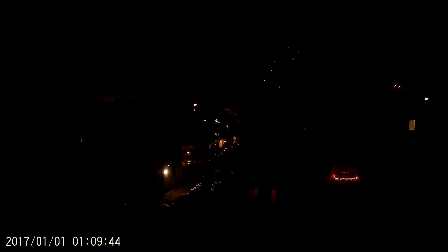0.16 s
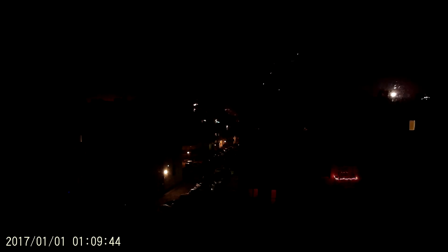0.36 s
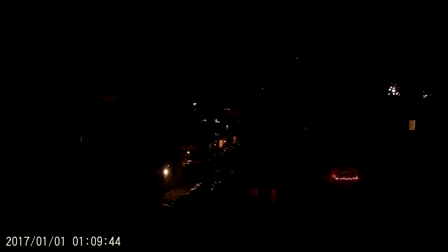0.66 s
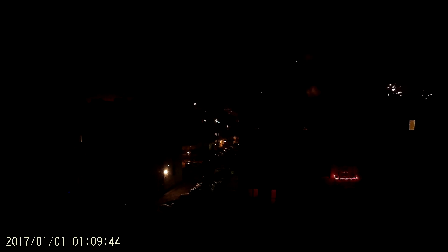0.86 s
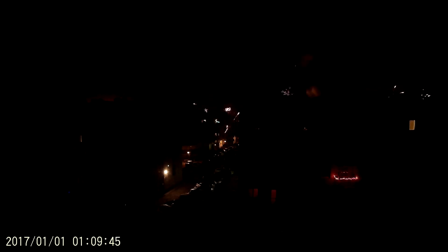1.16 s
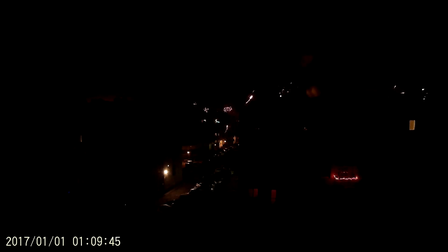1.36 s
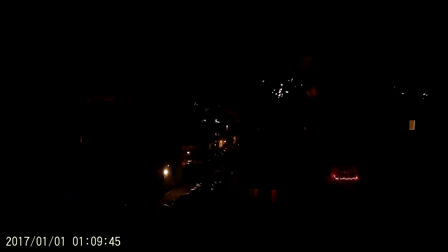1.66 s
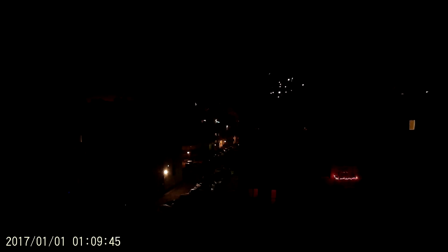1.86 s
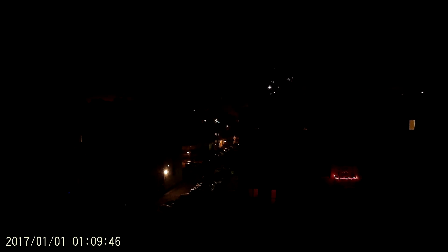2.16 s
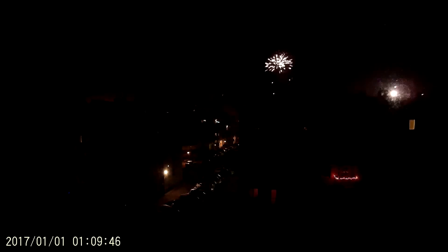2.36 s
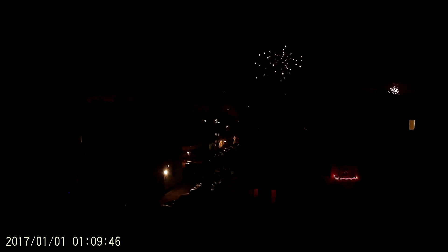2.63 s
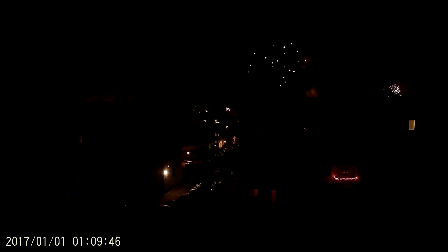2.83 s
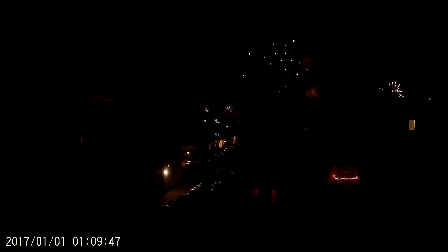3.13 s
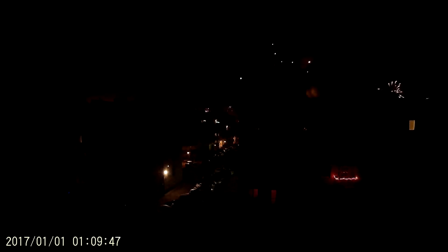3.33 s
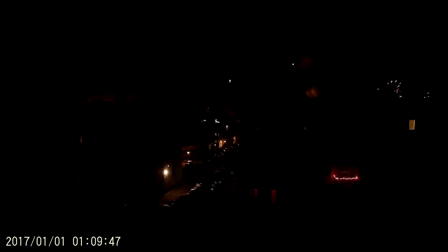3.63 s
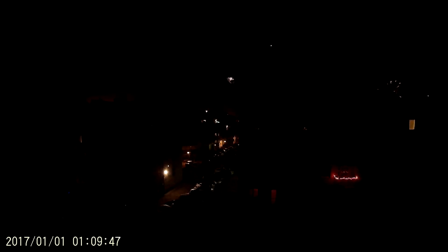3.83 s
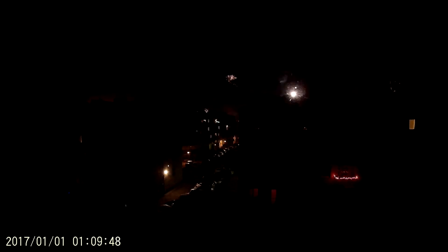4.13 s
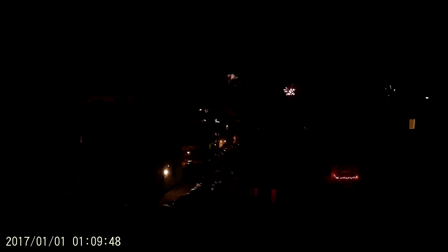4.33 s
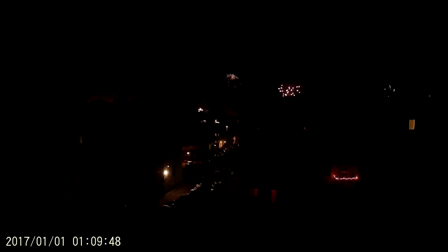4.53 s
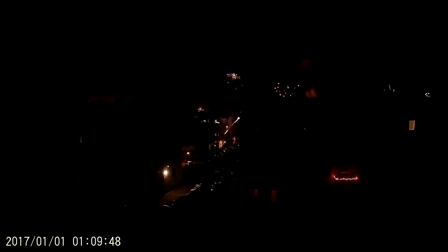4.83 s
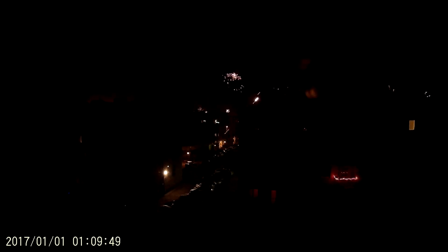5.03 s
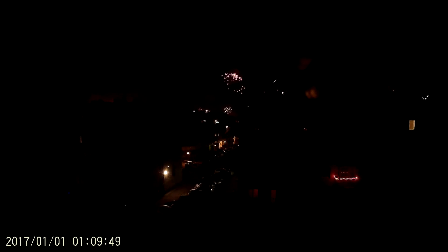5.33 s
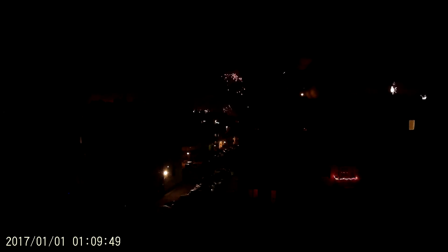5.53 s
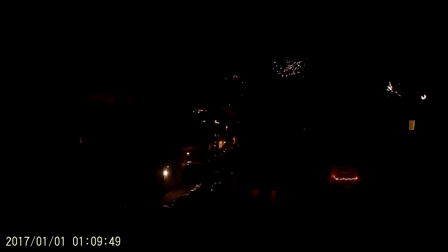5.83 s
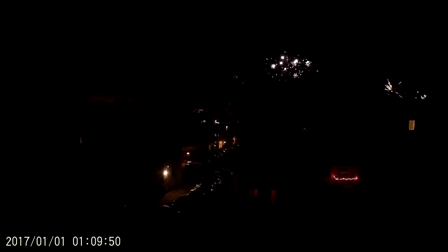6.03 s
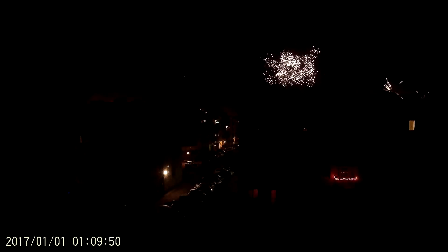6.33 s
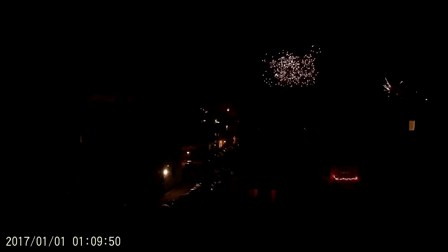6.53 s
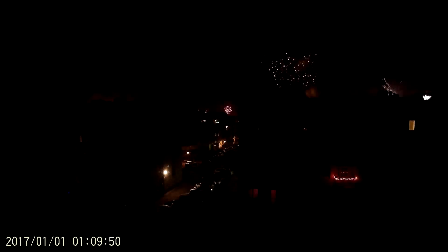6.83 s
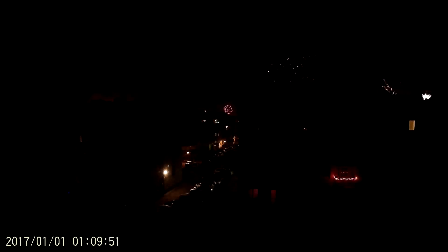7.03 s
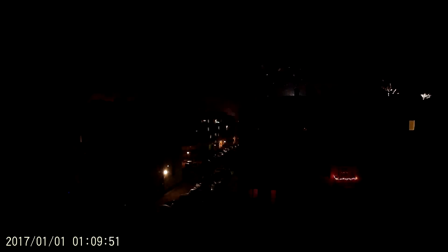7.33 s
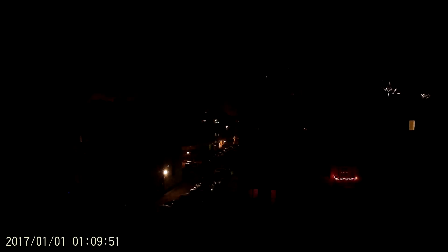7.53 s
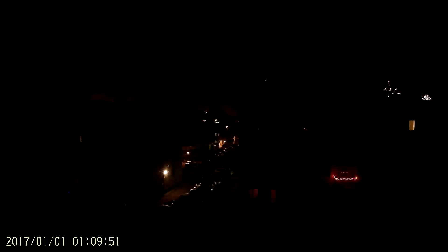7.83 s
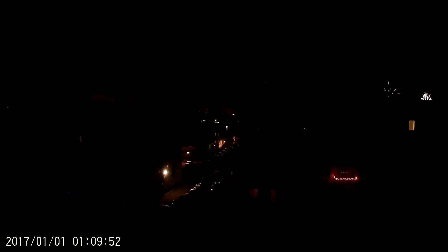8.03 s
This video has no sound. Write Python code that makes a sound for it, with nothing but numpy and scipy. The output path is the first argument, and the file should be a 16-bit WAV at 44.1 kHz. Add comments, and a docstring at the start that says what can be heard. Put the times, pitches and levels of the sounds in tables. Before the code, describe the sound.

Firework shells burst irregularly, near and far, over a residential street at night, each bang echoing between the houses. Dull thuds and faint hollow pops come first, then a loud boom, two sharp close cracks and a run of heavier bangs. Crackling swells above a distant rumble and low town drone. A small camera microphone makes it muffled and slightly ringing, with faint hiss and whine.

```python
"""Firework shells burst near and far over a street at night, each bang echoing between the houses. Burning
stars crackle above a distant rumble and the town's low drone, with faint fizzes, hollow pops and two sharp
cracks close by. A small camera picks it up: its housing muffles and rings, with a brief high ping on the
loudest bangs, and it hisses and whines faintly, more while treble keeps its expander open."""
import sys
import numpy as np
from scipy import signal
from scipy.fft import rfft, irfft, next_fast_len
from scipy.io import wavfile
from scipy.ndimage import uniform_filter1d, minimum_filter1d, map_coordinates

SR = 44100
rng = np.random.default_rng(int(sys.argv[2]) if len(sys.argv) > 2 else 0)


def wav_out(sig):
    """Save sig, one row per channel (or a flat mono array), as 16-bit PCM at SR to the path in sys.argv[1]."""
    wavfile.write(sys.argv[1], SR, np.round(np.clip(np.atleast_2d(sig).T, -1, 1) * 32767).astype(np.int16))


N = 360738

# Shells bursting; more tilt is brighter: start_s, level_db, tilt_db_per_octave, echo_db
SHELL_BURSTS = [(0.01, -29.5, -1, 5), (0.18, -33.5, -2.5, -11), (0.52, -38, -1.5, 13),
                (0.7615, -32.5, -1, 0), (1.337, -25, -7, -2), (1.3552, -23.5, -4, 3),
                (1.4991, -31.5, -2, -5), (1.7597, -25, -3, 6), (1.795, -31, 1, 7), (1.868, -38, 12, -1),
                (1.945, -26.5, -0.5, 4.5), (2.0772, -32, 0, -13), (2.3811, -32, -2.5, 9),
                (2.4947, -28, -3, 9), (2.561, -8, -0.5, 3), (2.6532, -24, -7, -5.5),
                (2.7249, -23.5, 1, 8.5), (2.75, -21, 1, 5.5), (2.9579, -20.5, -3.5, 1.5),
                (3.0965, -22.5, 2, -13.5), (3.3562, -19, -5, 2), (3.416, -18.5, -4.5, -3),
                (3.6531, -26, -3.5, 4), (3.8359, -24, 0, 6.5), (3.9019, -23.5, 2, 9),
                (4.1716, -34.5, -2.5, 15.5), (4.4115, -33, -2.5, 2), (4.7515, -33.5, 0.5, 5),
                (4.9251, -25.5, -3.5, 8), (5.1162, -24.5, 1, 9.5), (5.2301, -24.5, 4, 8),
                (5.3365, -13, 1, 0.5), (5.5236, -21.5, -2, 4), (5.635, -35.5, 2, 16),
                (5.966, -7, -1.5, 0.5), (6.1511, -20.5, -1, 4.5), (6.3902, -22.5, -6.5, 2.5),
                (6.4208, -17.5, 2, 7), (6.4761, -12.5, -1.5, 3), (6.4969, -20, -5, -11),
                (6.5319, -22.5, 6.5, 5.5), (6.921, -16, -1.5, 3), (7.099, -26, -2.5, -1),
                (7.1743, -20.5, -2, 3), (7.27, -22, 3.5, 0.5), (7.458, -25.5, -6, -1),
                (7.672, -31, -2.5, 6), (7.8195, -27, -2, 8), (8.097, -23, -2.5, 4.5)]
# Crackers close by: start_s, level_db, pitch_ratio, tilt_db_per_octave, echo_db
CLOSE_CRACKS = [(4.3673, -20, 1.22, -1.5, -23), (4.5983, -7.5, 0.994, 0, -5.5)]
# Swarms of stars, the burning pellets a shell throws out: start_s, burn_s, level_db
STAR_SWARMS = [(0.0, 0.46, -52.5), (0.58, 0.22, -49.5), (1.44, 0.052, -47), (1.871, 0.21, -50),
               (2.78, 0.47, -38), (3.42, 0.081, -40), (3.62, 0.48, -44.5), (4.198, 0.28, -47),
               (4.97, 0.11, -45.5), (5.131, 0.12, -39), (5.42, 0.25, -42.5), (6.12, 0.23, -33.5),
               (6.5, 0.545, -39.5), (7.201, 0.11, -40.5), (7.86, 0.12, -47.5), (8.121, 0.18, -43)]
# How loud the fireworks across town are: time_s, level_db
FAR_LEVELS = [(0, -42), (0.4, -52.5), (0.75, -51.5), (1.2, -56), (1.6, -46), (2.2, -52.5), (3.2, -49),
              (3.8, -46), (4.7, -54.5), (5.3, -41.5), (5.9, -52.5), (6.3, -39), (7.4, -52.5), (8.18, -48)]
# Faint high fizzes: middle_s, length_s, level_db
FIZZ_SWELLS = [(0.014, 0.07, -71), (.125, .06, -72), (.245, .06, -75), (6.492, 0.078, -67.5),
               (6.808, 0.063, -67.5), (7.901, 0.17, -76)]
# Hollow pops; fade is the time to drop 60 dB: start_s, pitch_hz, level_db, fade_s
HOLLOW_POPS = [(1.31, 570, -35, 0.1), (1.365, 567, -36.5, 0.57), (1.498, 1068, -32, 0.08),
               (4.751, 1068, -37.5, 0.12)]
# The brief high ping on the loudest bangs: pitch_hz
PING_PITCHES = [5170, 10800]
# Echoes off the ground and the nearest walls: delay_s, gain
WALL_ECHOES = [(.0033, 0.54), (.0046, 0.33), (.0087, 0.33), (0.0135, .2)]

# The tone of each sound, from bass to treble: frequency_hz, relative_level_db
TOWN_TONE = [(20, -18), (45, -10), (58, -2.5), (72, -7.5), (88, -4), (110, -9.5), (400, -28), (1200, -38.5)]
RUMBLE_TONE = [(20, -27), (35, -18), (60, -18.5), (105, -12.5), (150, -6), (230, -1.5), (350, -1),
               (600, -13.5), (1200, -22), (3000, -69)]
CRACKLE_TONE = [(100, -35.5), (250, -9.5), (450, -2), (800, 1), (960, -3), (1100, -12), (1300, -17),
                (1700, -20), (2300, -31), (3200, -40.5), (5000, -53), (7000, -90.5), (15000, -110)]
BLAST_TONE = [(25, -39), (55, -22.5), (100, -10.5), (200, 1), (450, 3), (800, -0.5), (960, -2),
              (1100, -7.5), (1300, -16.5), (1700, -22), (2300, -34.5), (3200, -42), (5000, -67.5),
              (7000, -72.5), (15000, -110)]
FIZZ_TONE = [(2500, -28), (3500, -3), (3900, 3), (4500, -7), (6000, -19)]
SNAP_TONE = [(30, -22), (70, -7.5), (214, 1), (663, -3), (938, -1), (1270, -11.5), (1880, -11.5),
             (2360, -23.5), (2780, -50), (3270, -24.5), (4620, -21.5), (5680, -45), (6840, -37.5),
             (12000, -71.5)]
HISS_TONE = [(20, 0), (2500, 1.5), (7000, -2.4), (15000, -3)]

# Notes the camera's housing rings at: pitch_hz, width_hz, boost_db
HOUSING_NOTES = [(230.8, 9.5, 6), (253, 11, -2), (441.3, 23.5, 5), (569.3, 19.2, 9.5), (736, 26, 2.5),
                 (928, 40, 7), (1381, 31, 5.5)]
# The camera's electronic whine: pitch_hz, relative_level_db
WHINE_NOTES = [(9416, -11), (9489, -1), (9525.4, 0), (9561.7, 0), (9634.6, -8), (9707, -12)]


def amp(db):
    """Turn decibels into a number to multiply by."""
    return 10 ** (np.asarray(db) / 20)


def unit(x):
    """Scale x to an average (rms) level of 1."""
    return x / np.sqrt(np.mean(x ** 2) + 1e-20)


def tone_db(tone, hz):
    """Read a tone table at any frequency, on a scale of octaves."""
    table_hz, table_db = np.transpose(tone)
    return np.interp(np.log(hz + 1), np.log(table_hz + 1), table_db)


def add(out, start_s, x):
    """Mix x into out from start_s on."""
    start = max(0, round(start_s * SR))
    out[start:start + len(x)] += x[:max(0, len(out) - start)]


def noise(tone):
    """Steady noise with the given tone, at level 1."""
    size = next_fast_len(N)
    gains = amp(tone_db(tone, np.fft.rfftfreq(size, 1 / SR)))
    return unit(irfft(rfft(rng.standard_normal(size)) * gains, size)[:N])


def clicks(samples, per_s, spread_db):
    """Clicks at random moments and of random sizes, at level 1."""
    hits = rng.random(samples) < per_s / SR
    sizes = amp(spread_db * np.clip(rng.standard_normal(samples), -2, 2))
    return unit(hits * sizes * rng.choice([-1, 1], samples))


def wobble(per_s):
    """Straight lines joining per_s random values a second."""
    values = rng.standard_normal(int(N * per_s / SR) + 4)
    return map_coordinates(values, [np.arange(N) * per_s / SR], order=1)


def housed_pulse(tone, tilt=0, treble_slope=0, size=8192):
    """One pulse ringing in the housing; more tilt or treble_slope (dB per octave) is brighter."""
    hz = np.fft.rfftfreq(size, 1 / SR)
    db = tone_db(tone, hz) + tilt * np.log2(np.clip(hz, 130, 1600) / 500)
    db += treble_slope * np.log2(np.maximum(hz / 1200, 1))
    db += sum(boost / (1 + (2 * (hz - pitch) / width) ** 2) for pitch, width, boost in HOUSING_NOTES)
    # keep this tone, but make the pulse hit first and ring afterwards
    cepstrum = irfft(np.log(amp(db)))
    cepstrum[1:size // 2] *= 2
    cepstrum[size // 2 + 1:] = 0
    return irfft(np.exp(rfft(cepstrum)))


def street_paths(echo_db, wall_gain, early_fade_s=0.44, late_fade_s=1.58, late_db=-15):
    """A bang arrives directly, off the nearest walls, and scattered between the houses."""
    t = np.arange(SR) / SR
    fade = amp(-60 * t / early_fade_s) + amp(late_db - 60 * t / late_fade_s)
    rise = 1 - np.exp(-(t / 0.0032) ** 2)
    paths = rise * fade * clicks(SR, per_s=3500, spread_db=2.5)
    paths *= amp(echo_db) / np.linalg.norm(paths)
    paths[0] += 1  # the direct sound
    for delay_s, gain in WALL_ECHOES:
        shift = np.exp(0.06 * rng.standard_normal())  # each shell bursts in another direction
        paths[round(delay_s * shift * SR)] += wall_gain * gain
    return paths


def blast(pulse, paths):
    """Scale a pressure pulse to a peak of 1 and send it along all its paths."""
    return signal.fftconvolve(pulse / np.abs(pulse).max(), paths)


def town_drone(level_db=-65.5):
    """The town makes a steady low noise."""
    return amp(level_db) * noise(TOWN_TONE)


def star_power(t, rise_s=0.014, thin_db_per_s=9.5, die_db_per_s=182):
    """Power of the crackle: each swarm lights, thins out as its stars burn away, then dies."""
    power = np.zeros(N)
    for start_s, burn_s, level_db in STAR_SWARMS:
        age = np.maximum(t - start_s, 0)
        fall_db = thin_db_per_s * age + die_db_per_s * np.maximum(age - burn_s, 0)
        power += (amp(level_db - fall_db) * np.minimum(age / rise_s, 1)) ** 2
    return power


def rolling_power(t, rise_s=0.093, fade_s=2.76):
    """Power of each burst rolling back from the streets around, swelling and slowly dying."""
    power = np.zeros(N)
    for start_s, level_db, _, echo_db in SHELL_BURSTS:
        age = np.maximum(t - start_s, 0)
        swell = amp(level_db - 60 * age / fade_s) * np.minimum(age / rise_s, 1)
        power += (1 + amp(echo_db) ** 2) * swell ** 2
    return power


def rumble_and_crackle(roll_rumble_db=-35, roll_crackle_db=-37.5, far_crackle_db=-3, clump_db=2.07):
    """Countless far bangs and rolling echoes blur into a rumble; stars crackle above it."""
    t = np.arange(N) / SR
    far = amp(np.interp(t, *np.transpose(FAR_LEVELS))) ** 2
    rolling = rolling_power(t)
    rumble_power = far + amp(roll_rumble_db) ** 2 * rolling
    crackle_power = amp(far_crackle_db) ** 2 * far + amp(roll_crackle_db) ** 2 * rolling + star_power(t)
    rumble = signal.fftconvolve(clicks(N, per_s=500, spread_db=1.5), housed_pulse(RUMBLE_TONE))
    crackle = signal.fftconvolve(clicks(N, per_s=2000, spread_db=0.5), housed_pulse(CRACKLE_TONE))
    out = np.zeros(N)
    for sound, power in (rumble, rumble_power), (crackle, crackle_power):
        clumps = amp(clump_db * wobble(per_s=22))  # pops and echoes arrive in uneven bunches
        out += np.sqrt(power) * clumps * unit(sound[:N])
    return out


def shells(boost_db=0.5, neutral_db=-14):
    """Shells burst: dull thuds far away, harder bangs overhead."""
    out = np.zeros(N)
    for start_s, level_db, tilt, echo_db in SHELL_BURSTS:
        # loud bangs sound brighter, faint ones duller
        treble_slope = 0.41 * (level_db + max(echo_db, 0) - neutral_db)
        pulse = housed_pulse(BLAST_TONE, tilt, treble_slope)
        paths = street_paths(echo_db, wall_gain=1)
        add(out, start_s, amp(level_db + boost_db) * blast(pulse, paths))
    return out


def fizzes():
    """High noise swells softly and fades, in short puffs."""
    t = np.arange(N) / SR
    swells = sum(amp(level_db) * np.exp(-(2 * (t - middle_s) / length_s) ** 2)
                 for middle_s, length_s, level_db in FIZZ_SWELLS)
    return swells * noise(FIZZ_TONE)


def hollow_pops(wander=0.044, rise_s=0.0048):
    """Each pop rings briefly on one unsteady note."""
    out, t = np.zeros(N), np.arange(SR // 2) / SR
    for start_s, pitch_hz, level_db, fade_s in HOLLOW_POPS:
        drift = unit(uniform_filter1d(rng.standard_normal(len(t)), size=200))
        phase = 2 * np.pi * np.cumsum(pitch_hz * (1 + wander * drift)) / SR
        loudness = amp(level_db - 60 * t / fade_s) * (1 - np.exp(-t / rise_s))
        add(out, start_s, loudness * np.sin(phase))
    return out


def loud_bang_pings(gain_db=-40.5, growth=1.8, fade_s=0.015, rise_s=0.00092):
    """A brief high ping grows so fast with a burst's level that it is heard only on the loudest."""
    out, t = np.zeros(N), np.arange(SR // 20) / SR
    loudness = amp(-60 * t / fade_s) * (1 - np.exp(-(t / rise_s) ** 2))
    ping = loudness * sum(np.sin(2 * np.pi * hz * t) for hz in PING_PITCHES)
    for start_s, level_db, _, _ in SHELL_BURSTS:
        add(out, start_s, amp(gain_db + growth * level_db) * ping)
    return out


def close_cracks(bounce_db=-5):
    """Close crackers keep their treble, but echo dully; a smaller charge snaps higher."""
    out = np.zeros(N)
    for start_s, level_db, pitch_ratio, tilt, echo_db in CLOSE_CRACKS:
        snap = housed_pulse([(hz * pitch_ratio, db) for hz, db in SNAP_TONE], tilt)
        add(out, start_s, amp(level_db) * blast(snap, paths=[1]))
        echoes = street_paths(echo_db, wall_gain=0.52)
        echoes[0] = 0  # leave out the direct sound
        thud = housed_pulse(BLAST_TONE, tilt)
        add(out, start_s, amp(level_db + bounce_db) * blast(thud, echoes))
    return out


def scene():
    """All the fireworks over the drone of the town, in mono."""
    bangs = shells() + close_cracks() + loud_bang_pings() + hollow_pops()
    return (bangs + rumble_and_crackle() + fizzes() + town_drone())[None]


def expander_opening(x, above_hz=1500, shut_db=-68, open_db=-60, smooth_s=0.036, wait_s=0.11):
    """The camera's expander, a volume control (0 shut, 1 open): lasting treble opens it, quiet shuts it."""
    treble = signal.sosfilt(signal.butter(4, above_hz, "high", fs=SR, output="sos"), x)
    level_db = 10 * np.log10(np.abs(uniform_filter1d(treble ** 2, size=256)) + 1e-12)
    smooth_db = uniform_filter1d(level_db, round(smooth_s * SR))
    half = round(wait_s * SR / 2)
    lasting_db = minimum_filter1d(smooth_db, 2 * half + 1, origin=half)  # lowest in the last wait_s
    return np.clip((lasting_db - shut_db) / (open_db - shut_db), 0, 1)


def record(dry, hiss_db=-73.5, whine_db=-91, top_hz=15720):
    """The camera adds hiss and whine, which rise as its expander opens, and cuts the highest treble."""
    t = np.arange(N) / SR
    opening = expander_opening(dry[0])
    hiss = amp(hiss_db + 5 * opening) * noise(HISS_TONE)
    notes = sum(amp(db) * np.sin(2 * np.pi * (hz * t + rng.random())) for hz, db in WHINE_NOTES)
    whine = amp(whine_db + 10 * opening) * notes
    size = next_fast_len(N + SR // 2)
    below_top = np.fft.rfftfreq(size, 1 / SR) < top_hz
    return irfft(rfft(dry + hiss + whine, size) * below_top, size)[:, :N]


dry = scene()
out = record(dry)
wav_out(out)
```